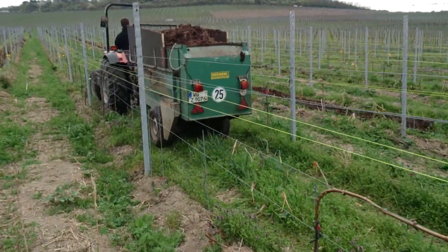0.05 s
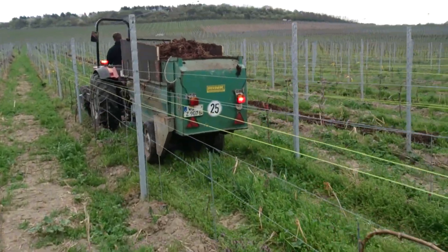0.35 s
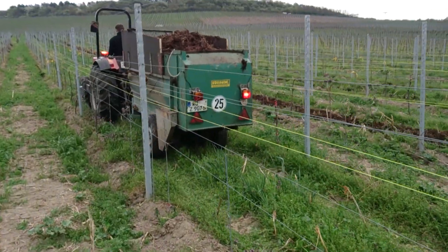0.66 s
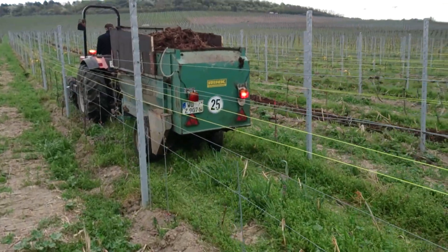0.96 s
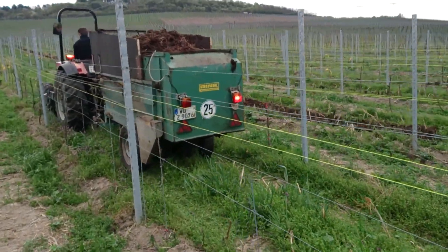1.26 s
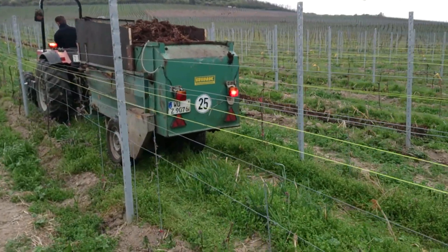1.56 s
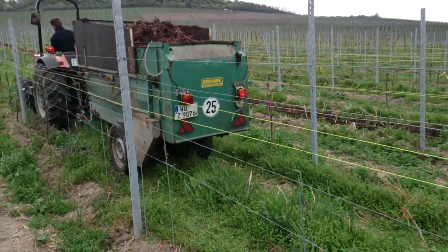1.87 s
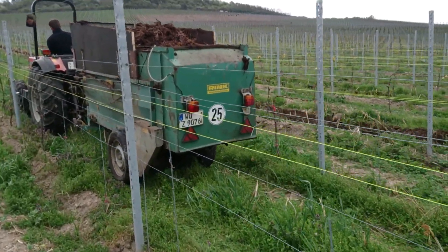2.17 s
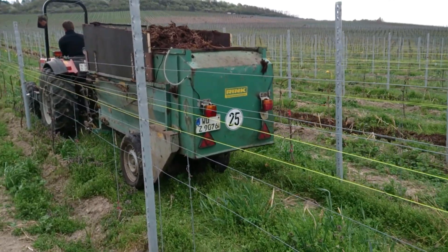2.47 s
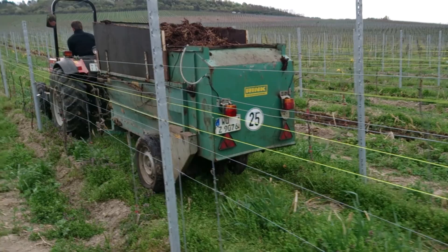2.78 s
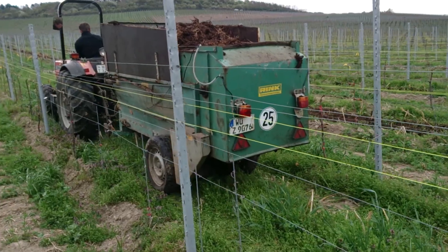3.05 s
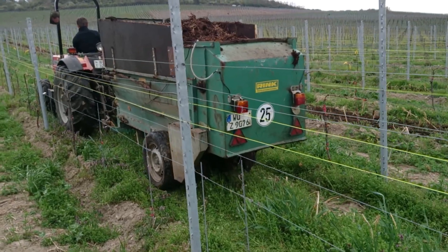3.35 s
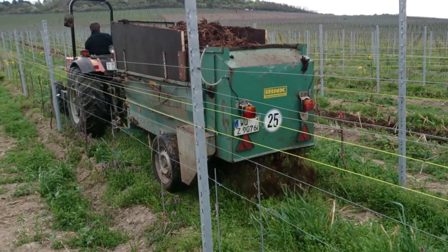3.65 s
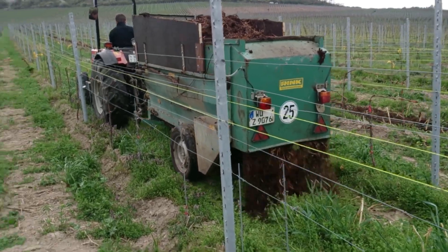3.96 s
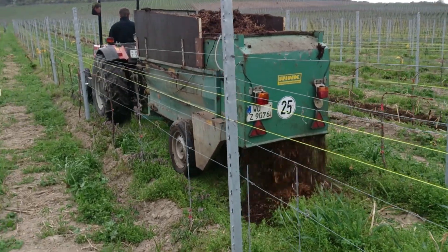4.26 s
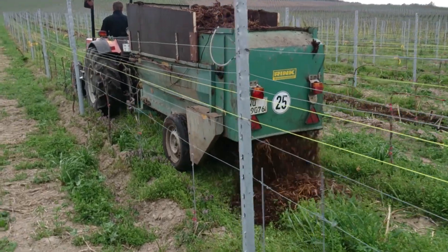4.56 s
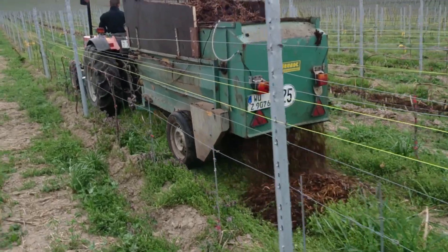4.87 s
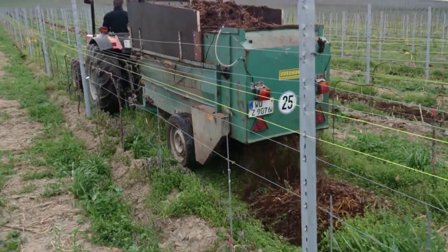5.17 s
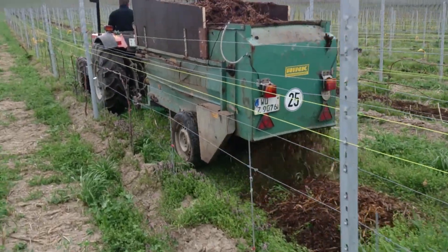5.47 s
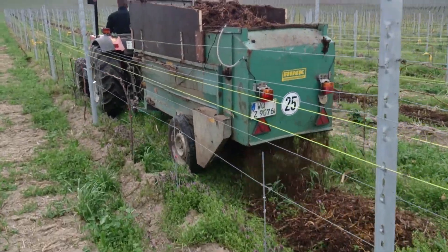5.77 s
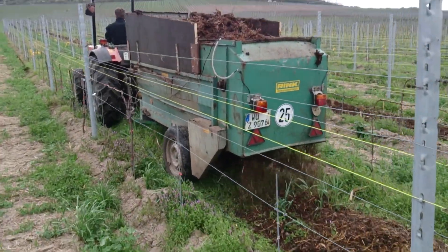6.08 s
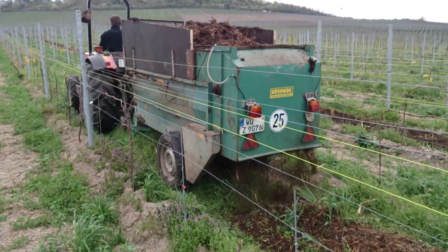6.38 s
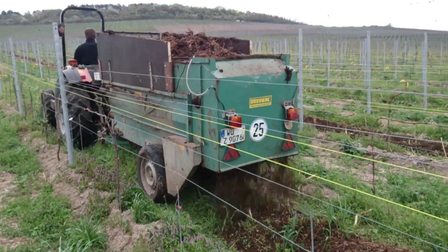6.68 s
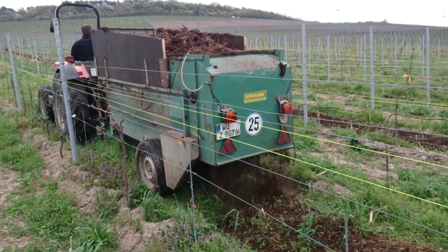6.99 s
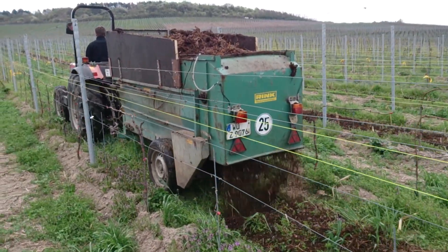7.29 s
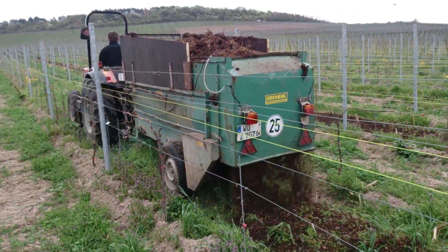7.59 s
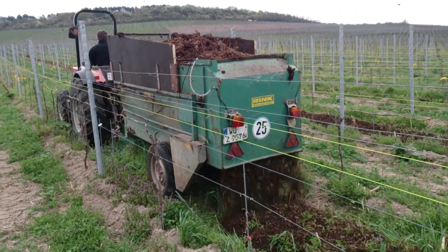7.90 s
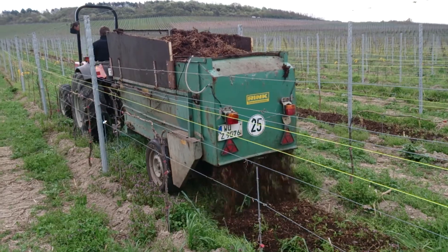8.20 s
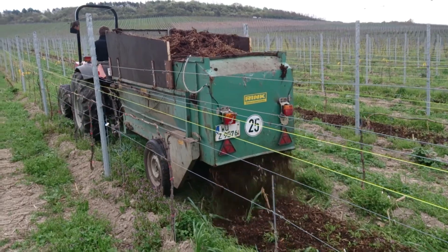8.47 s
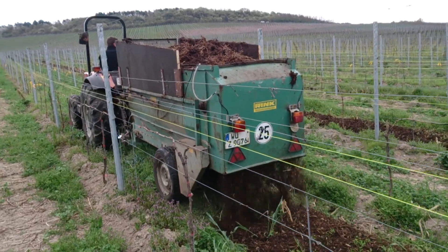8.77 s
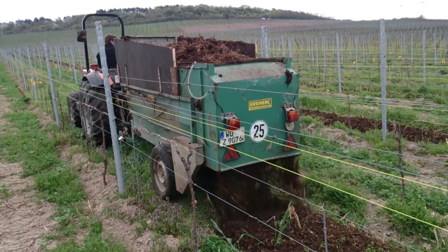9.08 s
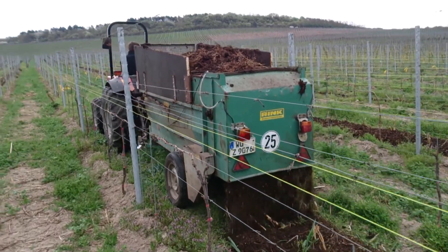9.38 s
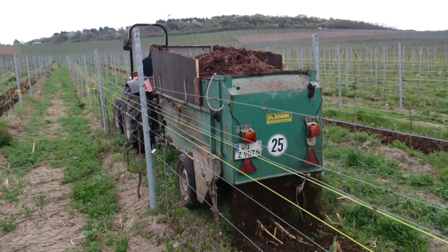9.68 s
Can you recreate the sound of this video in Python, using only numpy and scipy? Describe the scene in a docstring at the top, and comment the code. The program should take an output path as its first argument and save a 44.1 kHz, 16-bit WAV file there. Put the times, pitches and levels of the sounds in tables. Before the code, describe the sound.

Low tractor chugging climbs to a steady drone, joined by sharp ratchet bursts about twice a second from a working spreader.

```python
"""Tractor and compost spreader

A diesel tractor idles in a vineyard row, revs up and drives a spreader a few metres away.
Exhaust pulses boom and the block knocks. About twice a second the feed chain takes up load,
then steel pawls clatter over the ratchet and tick back. Compost patters, grass rustles; no reverb."""
import sys
import numpy as np
from scipy import signal
from scipy.fft import rfft, irfft, next_fast_len
from scipy.io import wavfile
from scipy.ndimage import uniform_filter1d

SR = 44100
rng = np.random.default_rng(int(sys.argv[2]) if len(sys.argv) > 2 else 0)


def wav_record(signal):
    """Record a signal, one row per channel, as 16-bit PCM in the file named by sys.argv[1]."""
    frames = np.transpose(np.atleast_2d(signal))
    bounded = np.clip(frames, -1, 1)
    # unit amplitude maps onto the largest positive 16-bit level
    quanta = np.round(bounded * 32767).astype(np.int16)
    wavfile.write(sys.argv[1], SR, quanta)


N = 433944
TIME_S = np.arange(N) / SR
FFT_SIZE = next_fast_len(N + 16384)
FREQ_HZ = np.arange(FFT_SIZE // 2 + 1) * SR / FFT_SIZE

# Engine speed. Each row: time in seconds, firing rate in Hz.
FIRING_RATE = [(0, 23.1), (.55, 18.46), (2.1, 18.81), (2.2, 22.97), (2.6, 25.55), (3.1, 22.54),
               (3.45, 32.41), (3.6, 35.86), (3.9, 46.95), (4.35, 59.64), (5.1, 58.22), (5.8, 61.96),
               (9.84, 61.73)]
# A blip, a rev-up in pushes, then steady load. Each row: time in seconds, combustion force in dB.
COMBUSTION_FORCE = [(0, -56), (2.16, -55), (2.18, -30.5), (2.275, -30), (2.31, -55), (2.95, -47),
                    (3.14, -32), (3.22, -33), (3.3, -41), (3.33, -22), (3.43, -16), (3.465, -18.5),
                    (3.495, -28), (3.55, -28), (3.58, -20.5), (3.63, -21), (3.81, -12.5), (3.9, -14.5),
                    (4.02, -24.5), (4.15, -15.5), (4.3, -26), (4.5, -33.5), (6.0, -27), (9.84, -29)]
# Cylinders in firing order. Each row: relative strength, delay at full speed in ms.
CYLINDER_SPREAD = [(1, .45), (-0.5, 0.14), (-5.5, -.45), (-.5, -0.1)]
# Gear whines. Each entry: cycles per firing in the first list, relative level in dB in the second.
GEAR_ORDERS = [7.5, 10.25, 12, 13.75]
GEAR_DB = [-7, -16.5, -10, -9.5]
# Engine spectra. Each row: frequency in Hz, gain in dB.
BOOM_SPECTRUM = [(12, -27), (24, -11), (38, 5.5), (55, 1), (76, -0.5), (100, -14), (125, -11.5), (160, -16),
                 (300, -54)]
BARK_SPECTRUM = [(8, -16), (35, 3), (70, 1), (120, 2), (170, -1.5), (235, -10), (320, -22.5), (500, -33),
                 (1200, -33.5), (7000, -56)]
EDGE_SPECTRUM = [(150, -30), (250, -1), (320, 0), (420, -8), (600, -20), (4000, -100)]
GAS_SPECTRUM = [(30, -49), (90, -3), (130, -3), (180, -2.5), (235, -4), (290, -13.5), (400, -26),
                (900, -52)]
BLOCK_SPECTRUM = [(180, -23.5), (300, -5), (369, -9), (424, -9), (464, -1.5), (549, -2.5), (600, 0.5),
                  (816, 1), (1020, -9), (1240, -3), (1370, 0.5), (1490, -4.5), (1650, -4), (3200, -15),
                  (4160, -17), (7040, -120)]
# Exhaust and casting resonances. Each row: frequency in Hz, width in Hz, gain in dB.
TAILPIPE_MODES = [(76.4, 15, -4), (134.5, 16, -5.5), (168, 10, -2.5), (229, 17, -2), (264, 17, -3.5)]
SILENCER_MODES = [(38.4, 10, -1), (74, 11, 1)]
THROB_MODES = [(24, 4.2, 9), (47.6, 11, 5), (70, 12, 3), (98, 12, -2), (123, 6.2, -5), (165, 25, -11)]
KNOCK_MODES = [(793, 150, 1), (1260, 260, 1), (2130, 1200, 2.5), (3950, 170, 7), (4900, 1200, -3)]
HARD_KNOCK_MODES = [(713, 83, 18.5), (822, 47, 21.5), (1296, 200, 20), (1980, 91, 12), (2660, 180, 4),
                    (4060, 380, 9), (5340, 310, 16.5)]
# Exhaust envelopes. Each row: time in seconds, relative level in dB.
BOOM_ENVELOPE = [(2.14, -70), (2.18, -26), (2.27, -28), (2.33, -50), (3.0, -51), (3.15, -37), (3.4, -30),
                 (3.53, -27), (3.8, -25), (4.0, -19), (4.22, -21.5), (4.5, -24.5), (4.9, -22), (6.1, -27),
                 (9.84, -26.5)]
THROB_ENVELOPE = [(0, -41), (.5, -46), (2.1, -44), (2.25, -29), (2.55, -34), (3.0, -34), (3.2, -29),
                  (3.7, -42)]
HUM_ENVELOPE = [(0, -43), (.48, -45), (.52, -36), (.58, -44), (.68, -42), (.74, -35), (1.12, -35.5),
                (1.24, -45), (1.28, -35), (1.45, -35.5), (1.5, -50), (1.6, -32.5), (1.67, -50), (1.72, -35),
                (1.82, -32), (1.91, -40), (2.14, -33.5), (3.3, -60)]
# Shudders at idle. Each row: start in seconds, level in dB.
IDLE_SHUDDERS = [(.468, -48), (1.595, -50), (1.94, -49), (2.133, -41), (2.342, -49)]

# Feed strokes, about 33 firings apart. Each row: start in seconds, clatter gain in dB, load gain in dB.
FEED_STROKES = [(4.2008, -1.5, 6), (4.7751, 0.5, 2.5), (5.339, -0.5, 4.5), (5.884, 1, 5.5), (6.422, -1, 4),
                (6.9605, 2, 5), (7.495, 0, 4.5), (8.0326, 1, 2), (8.5714, 1.5, 5.5), (9.1095, 1, 4),
                (9.649, -1, 5)]
# Four pawls and a bounce per stroke. Each row: delay in firings, gain in dB, chatter in seconds.
STROKE_DROPS = [(0, -6, .007), (1.02, -7, 0.0073), (2.1, -7, .012), (3.45, -6, 0.0058), (4.7, -22, 0.004)]
# Single sharp metallic clicks: start-up strikes, late pawl drops and one lone click.
# Each row: start in seconds, gain in dB.
SINGLE_CLICKS = [(3.495, -10), (3.5195, -11), (3.549, -7.5), (3.634, -12), (3.7117, -5.5), (4.313, -12),
                 (4.919, -19), (5.1504, -9), (5.989, -7), (6.5205, -5.5), (7.052, -11), (7.064, -8.5),
                 (7.593, -5), (8.133, -5), (8.618, -9), (8.671, -4.5), (9.2058, -3), (9.749, -8.5)]
# Loose couplings. Each row: start in seconds, gain in dB.
COUPLING_CLINKS = [(2.179, -32), (2.229, -33.5), (3.092, -40.5), (3.13, -33), (3.252, -37)]
# Spreader steel resonances. Each row: frequency in Hz, width in Hz, gain in dB.
PAWL_MODES = [(7240, 55, 2), (7550, 83, 0), (7970, 65, 0), (8050, 74, 7.5), (8260, 61, -2), (8440, 46, -3),
              (8760, 50, -4), (9200, 98, -16), (9600, 90, -1.5), (13080, 200, -6), (13400, 230, 1.5),
              (13660, 300, -3)]
WHEEL_MODES = [(3540, 40, 4), (4040, 60, -1), (4380, 45, -2), (4850, 70, -1), (5540, 40, -3),
               (6620, 50, -1)]
CATCH_MODES = [(7240, 71, -1), (7300, 90, 1), (7470, 110, -11), (12100, 390, -7), (12300, 400, -13)]
LINK_MODES = [(632, 68, 6), (1378, 44, 2), (1720, 100, -3.5), (1950, 80, 1), (3250, 130, 0),
              (3510, 110, -2.5), (3870, 105, -1)]
BODY_MODES = [(1337, 20, 0), (1377, 14, 7), (1394, 17, 6.5), (1432, 31, -9), (1694, 30, -2.5),
              (1930, 40, -2), (2750, 16, -12), (3170, 17, -9), (3540, 24, -3.5), (4020, 69, -7),
              (4530, 170, -8)]
COUPLING_MODES = [(4070, 200, 17), (5260, 420, 15.5), (6100, 280, 13)]
# Spreader spectra. Each row: frequency in Hz, gain in dB.
CRACK_SPECTRUM = [(1200, -14), (2800, -8.5), (3550, -1), (4700, -6.5), (6000, -8.5), (7200, 4.5),
                  (8500, 7.5), (11300, -7), (13400, 8.5), (15500, -25)]
CLUNK_SPECTRUM = [(200, 8), (400, 11.5), (700, -6), (1050, 15.5), (1400, 15), (2100, 7), (2800, 12),
                  (3700, -3), (6000, 1), (10000, 9.5), (15000, -17)]
GROAN_SPECTRUM = [(150, 2), (240, 3.5), (380, -5.5), (700, 10), (1050, 1), (1400, 7), (2100, 0),
                  (3700, -3.5), (6000, -4.5), (12000, -17)]
COMPOST_SPECTRUM = [(500, 1), (1500, -5.5), (2100, -2.5), (3000, -5), (4300, 4.5), (6000, 0), (8000, 1),
                    (10000, 3), (13000, -0.5), (15500, 3.5)]
# Slipping drive. Each row: time in seconds, level in dB, pitch in Hz.
DRIVE_SLIP = [(3.22, -90, 5630), (3.33, -32, 5580), (3.7, -38, 6200), (3.85, -27, 6440), (4.1, -32, 5970),
              (4.3, -24, 5520), (4.45, -73, 5630)]
# Compost, brake and grass envelopes. Each row: time in seconds, relative level in dB.
COMPOST_ENVELOPE = [(3.25, -50), (3.42, -35), (3.53, -23), (3.62, -32), (3.76, -25.5), (4.2, -32.5),
                    (4.6, -30), (6.5, -31), (8.5, -28.5), (9.84, -29.5)]
BRAKE_ENVELOPE = [(.38, -91), (.48, -63), (.64, -52), (.74, -55), (.86, -90)]
RUSTLE_ENVELOPE = [(0, -47), (.5, -50.5), (1.05, -50), (1.5, -53), (2.1, -47.5), (2.45, -47.5), (3.3, -44)]

# Stalk snaps and swishes. Each row: start in seconds, relative level in dB, hold in seconds.
STALK_SNAPS = [(.235, -39, 0.032), (.345, -45, .02), (.694, -37, .001), (.709, -37, .002),
               (.83, -49, 0.049), (.961, -43, .001), (1.31, -35, .002), (1.722, -41, 0.018),
               (1.78, -37.5, 0.077), (1.835, -35, .002), (1.914, -38, .001), (2.64, -42.5, 0.045),
               (2.99, -37, .002), (3.279, -35, .002)]
# Grass spectra. Each row: frequency in Hz, gain in dB.
RUSTLE_SPECTRUM = [(1500, 3), (2400, 7), (3400, 1), (4200, 4), (7000, 1), (10000, 2), (14000, 2),
                   (16000, 4.5)]
SNAP_SPECTRUM = [(1500, -14), (3200, -4), (4300, 1), (5500, 1), (7500, 2), (10000, 2), (14000, 7),
                 (15500, 12.5)]
# Microphone response. Each row: frequency in Hz, gain in dB.
MIC_RESPONSE = [(5, -37), (25, -1), (300, -1), (1500, 0.5), (2200, 1), (4500, -2), (8000, 0.5),
                (13500, 1.5), (14500, -4), (15500, -13)]
# Microphone ports. Each row: frequency in Hz, left minus right in dB.
PORT_BALANCE = [(100, 0.36), (700, 0.5), (1400, 1), (2500, 4.5), (5000, 4), (7500, 6.5), (10000, 16.5),
                (11200, 8), (12400, 3.5), (13500, -6.5), (15500, 21)]


def engine(firing_hz, firings):
    """Four-cylinder diesel: exhaust and block follow speed and combustion force."""
    speed = firing_hz / firing_hz.max()
    force_db, = curves(COMBUSTION_FORCE)
    pipe = gas_rush(speed, firings) + idle(firings) - exhaust(speed, firings, force_db)
    castings = block(speed, firings, force_db) + diesel_knock(speed, firings, force_db)
    return place(pipe, lag_ms=0.12) + place(castings, lag_ms=0.26)


def exhaust(speed, firings, force_db):
    """Each firing sends a pulse down the pipe: a soft boom and a bark that rings the tailpipe."""
    fired = firing_samples(firings)
    boom_jitter, bark_jitter, time_jitter = rng.standard_normal((len(fired), 3)).T
    # Cylinders differ most at full speed, adding lines between the firing harmonics.
    imbalance = speed[fired] ** 7
    strength, skew_ms = np.resize(CYLINDER_SPREAD, (len(fired), 2)).T * imbalance
    delay_ms = 3.8 + skew_ms + (0.056 + 0.15 * imbalance) * time_jitter
    arrivals = np.clip(fired + (SR * delay_ms / 1000).astype(int), 0, N - 1)
    booms, barks = np.zeros((2, N))
    booms[arrivals] = amp(0.041 * strength + 0.35 * boom_jitter)
    barks[arrivals] = amp(1.54 * strength + (1.2 + 0.73 * imbalance) * bark_jitter)
    boom_db, = curves(BOOM_ENVELOPE)
    boom = steady(filtered(booms, amp(spectrum_db(BOOM_SPECTRUM)))) * amp(boom_db - 1.5)
    bark = filtered(barks, amp(spectrum_db(BARK_SPECTRUM)))
    bark = steady(bark + ring(bark, TAILPIPE_MODES)) * amp(force_db - 0.5)
    # The hardest pulses steepen in the pipe.
    edge = steady(filtered(barks, amp(spectrum_db(EDGE_SPECTRUM))))
    return boom + bark + edge * amp(1.6 * force_db - 24.5) / speed ** 2


def gas_rush(speed, firings):
    """Gas rushes out after each firing; turbulence grows with speed."""
    return unit(colour(surge(firings) * noise(), GAS_SPECTRUM)) * amp(-30.5) * speed ** 2.06


def idle(firings):
    """Weak, uneven firings and swirling gas swing pipe and silencer; shudders knock the castings."""
    fired = firing_samples(firings)
    time_jitter, level_jitter = rng.standard_normal((len(fired), 2)).T
    arrivals = np.clip(fired + (SR * 0.0011 * time_jitter).astype(int), 0, N - 1)
    pulses = np.zeros(N)
    pulses[arrivals] = amp(2.5 * level_jitter)
    muffle = 1 / np.sqrt(1 + (FREQ_HZ / 185) ** 16)  # silencer low-pass
    swirl = 0.5 * noise() * puffs(firings, decay_firings=0.6)
    throb = ring(filtered(unit(pulses) + swirl, muffle), THROB_MODES)
    hum = ring(ring(filtered(pulses, muffle), SILENCER_MODES), SILENCER_MODES)
    throb_db, = curves(THROB_ENVELOPE)
    hum_db, = curves(HUM_ENVELOPE)
    shudders = bursts([(s, db, 0.012) for s, db in IDLE_SHUDDERS], decay_s=0.016)
    knocks = shudders * unit(ring(stereo_noise(apart=0.4), HARD_KNOCK_MODES))
    return knocks - steady(throb) * amp(throb_db) - steady(hum) * amp(hum_db)


def block(speed, firings, force_db):
    """Block noise grows with speed and force; gears whine at multiples of the firing rate."""
    gain = np.hypot(amp(-29.5 + 10 * np.log2(speed)), amp(-15.5 + 0.77 * force_db))
    roar = unit(colour(surge(firings) * stereo_noise(apart=0.32), BLOCK_SPECTRUM))
    whine = sum(np.sin(2 * np.pi * order * firings + 0.71 * drift(7)) * amp(db - 5 + 2 * drift(4.5))
                for order, db in zip(GEAR_ORDERS, GEAR_DB))
    return gain * (roar + whine * speed ** 8)


def diesel_knock(speed, firings, force_db):
    """Combustion rings the castings; with much fuel at low speed each firing is a separate crack."""
    speed_db = 10 * np.log2(speed)
    impacts = puffs(firings, decay_firings=0.32) * stereo_grains(6000, spread_db=2, apart=1)
    running = unit(ring(impacts, KNOCK_MODES)) * amp(-38.5 + speed_db)
    crack_db = force_db - 17.5 - speed_db
    lag_s = 0.0015
    cracks = [(TIME_S[i] + lag_s, crack_db[i], 0.002) for i in firing_samples(firings)]
    return running + ring(bursts(cracks, decay_s=0.004) * stereo_noise(apart=0.45), HARD_KNOCK_MODES)


def ratchet(firings):
    """Each pawl cracks down and chatters, ringing pawl and wheel; single clicks share that ring."""
    strikes = [(later_s(firings, s, delay) + rng.normal(0, 0.00038), db + drop_db, chatter_s)
               for s, db, _ in FEED_STROKES for delay, drop_db, chatter_s in STROKE_DROPS]
    strikes += [(s, db, 0.0074) for s, db in SINGLE_CLICKS]
    rebounds = bursts(strikes, decay_s=0.0075)
    blows = bursts([(s, db, 0.001) for s, db, _ in strikes], decay_s=0.0006)
    rattle = stereo_grains(22000, spread_db=0.3, apart=0.85)
    contact = (rebounds + 1.3 * blows) * rattle
    pawl = amp(-30.5) * unit(ring(contact, PAWL_MODES))
    wheel = amp(-46) * unit(ring(contact, WHEEL_MODES))
    crack = amp(-30) * unit(colour(rebounds * rattle, CRACK_SPECTRUM))
    return place(pawl + wheel + crack, lag_ms=0.17)


def catch_return(firings):
    """The catch ticks back over five teeth after each stroke, louder as the spreader runs in."""
    return_firings, tooth_firings, rise_db_per_s = 11.9, 1.9, 1
    teeth = [(later_s(firings, s, return_firings + tooth * tooth_firings),
              -7.5 + rise_db_per_s * s + rng.normal(0, 1.5), 0.005)
             for s, _, _ in FEED_STROKES for tooth in range(5)]
    ticks = bursts(teeth, decay_s=0.012) * stereo_grains(2600, spread_db=1.5, apart=0.92)
    ringing = amp(-43) * unit(ring(ticks, CATCH_MODES))
    crack = amp(-44) * unit(colour(ticks, CRACK_SPECTRUM))
    return place(ringing + crack, lag_ms=0.17)


def floor_chain(firings):
    """The chain jolts taut once, then crunches and groans forward just before each stroke's pawls."""
    lead_firings, load_s = 2.65, 0.18
    jolt_s, jolt_db, jolt_hold_s = 3.707, 10.5, 0.013
    loads = [(later_s(firings, s, -lead_firings), db, load_s) for s, _, db in FEED_STROKES]
    loads.append((jolt_s, jolt_db, jolt_hold_s))
    jerk = bursts([(s + 0.0017, db, 0.022) for s, db, _ in loads], decay_s=0.0065)
    jerk = uniform_filter1d(jerk, size=500)  # slack comes out link by link
    links = jerk * stereo_grains(7000, spread_db=1.2, apart=0.7)
    clunk = amp(-42) * unit(colour(links, CLUNK_SPECTRUM)) + amp(-40.5) * unit(ring(links, LINK_MODES))
    pull = bursts(loads, decay_s=0.057) * amp(3 * drift(70))
    rub = pull * stereo_grains(5000, spread_db=1, apart=0.65)
    groan = amp(-36.5) * unit(colour(rub, GROAN_SPECTRUM)) + amp(-44) * unit(ring(rub, LINK_MODES))
    return place(clunk + groan, lag_ms=0.2)


def body_drone():
    """The spreader's steel body drones as the beaters spin up."""
    gain = amp(-36.5 + 2.4 * drift(12)) * ramp(start_s=3.3, rise_s=1)
    return place(gain * unit(ring(stereo_noise(apart=0.49), BODY_MODES)), lag_ms=0.2)


def compost():
    """Compost patters down; hard bits tick against the steel."""
    flow_db, = curves(COMPOST_ENVELOPE)
    crumbs = stereo_grains(14000, spread_db=1.8, apart=1.3) * amp(0.9 * drift(30))
    patter = amp(flow_db) * ramp(start_s=3.25, rise_s=0.081) * unit(colour(crumbs, COMPOST_SPECTRUM))
    bits = ramp(start_s=3.5, rise_s=0.5) * grains(5.8, spread_db=0.5)
    return place(patter + amp(-57) * unit(colour(bits, CRACK_SPECTRUM)), lag_ms=0.2)


def drive_slip(firings):
    """The engaging drive slips at each firing with a rough hiss."""
    slip_db, slip_hz = curves(DRIVE_SLIP)
    rough = unit(colour(stereo_noise(apart=0.7), [(350, 0), (700, -6), (1400, -18), (3000, -45)]))
    chop = unit(puffs(firings, decay_firings=0.32) + 0.24)
    return place(rough * chop * amp(slip_db) * tone(slip_hz), lag_ms=0.14)


def couplings():
    """Loose drive couplings clink before the spreader starts."""
    clinks = bursts([(s, db, 0.003) for s, db in COUPLING_CLINKS], decay_s=0.01)
    return place(ring(clinks * stereo_noise(apart=0.41), COUPLING_MODES), lag_ms=0.2)


def brake():
    """A thin, wavering brake squeal while creeping."""
    brake_db, = curves(BRAKE_ENVELOPE)
    return place(amp(brake_db) * tone(9055 + 22 * drift(64)), lag_ms=0.14)


def grass():
    """Stalks crackle and snap under tyres and boots, a little to the right."""
    bed_db, = curves(RUSTLE_ENVELOPE)
    crackle = stereo_grains(8000, spread_db=3.5, apart=2.3)
    bed = amp(bed_db + 4 + 2 * drift(16)) * unit(colour(crackle, RUSTLE_SPECTRUM))
    snap_gain = bursts(STALK_SNAPS, decay_s=0.0067) * amp(4.5 + 3.1 * drift(80.17))
    snaps = snap_gain * unit(colour(crackle, SNAP_SPECTRUM))
    return (bed + snaps) * amp([[-2.25], [2.25]])


def firing_samples(firings):
    """First sample of each firing."""
    return np.flatnonzero(np.diff(np.floor(firings))) + 1


def later_s(firings, start_s, count):
    """The time count firings after start_s."""
    return np.interp(np.interp(start_s, TIME_S, firings) + count, firings, TIME_S)


def puffs(firings, decay_firings):
    """Envelope that jumps at each firing and decays."""
    return unit(np.exp(-(firings % 1) / decay_firings))


def surge(firings):
    """Shallow pulsing at the firing rate."""
    return unit(puffs(firings, decay_firings=0.43) + 5.3)


def bursts(rows, decay_s):
    """Envelope of contacts that start at once, hold, then decay; powers add."""
    power = np.zeros(N)
    for start_s, db, hold_s in rows:
        start = int(start_s * SR)
        age_s = TIME_S[:min(N - start, SR // 2)]
        envelope = amp(db) * np.exp(-np.maximum(age_s - hold_s, 0) / decay_s)
        power[start:start + len(age_s)] += envelope ** 2
    return np.sqrt(power)


def ramp(start_s, rise_s):
    """Linear fade from 0 to 1."""
    return np.clip((TIME_S - start_s) / rise_s, 0, 1)


def curves(rows):
    """Table columns interpolated over time."""
    times_s, *columns = np.transpose(rows)
    return [np.interp(TIME_S, times_s, column) for column in columns]


def tone(hz):
    """Sine of varying pitch."""
    return np.sin(2 * np.pi * np.cumsum(hz) / SR)


def noise():
    """White noise."""
    return rng.standard_normal(N)


def drift(rate_hz):
    """Smooth random motion, rms 1."""
    span = int(SR / rate_hz)
    steps = np.repeat(rng.standard_normal(N // span + 1), span)
    return unit(uniform_filter1d(uniform_filter1d(steps, span), span)[:N])


def grains(per_s, spread_db):
    """Random tiny impacts of uneven size."""
    impacts = (rng.random(N) < per_s / SR) * noise()
    return unit(impacts * amp(spread_db * np.minimum(rng.exponential(size=N), 5)))


def stereo_noise(apart):
    """Shared noise plus a separate share per side."""
    return unit(noise() + apart * np.array([noise(), noise()]))


def stereo_grains(per_s, spread_db, apart):
    """Shared impacts plus a separate share per side."""
    shared, left, right = (grains(per_s, spread_db) for _ in range(3))
    return unit(shared + apart * np.array([left, right]))


def amp(db):
    """Decibels to gain."""
    return 10 ** (np.asarray(db) / 20)


def unit(x):
    """Scale to rms 1."""
    return x / np.sqrt(np.mean(x ** 2))


def steady(x):
    """Hold a pulse train near rms 1 as its rate changes."""
    power = uniform_filter1d(uniform_filter1d(x ** 2, size=4800), size=4800)
    return x / np.sqrt(power + 1e-12)


def spectrum_db(points):
    """(Hz, dB) points interpolated over log frequency."""
    hz, db = np.transpose(points)
    return np.interp(np.log(FREQ_HZ + 1), np.log(hz), db)


def filtered(x, response):
    """Apply a frequency response."""
    return irfft(rfft(x, FFT_SIZE) * response, FFT_SIZE)[..., :N]


def colour(x, points):
    """Minimum-phase filter with the given spectrum."""
    cepstrum = irfft(np.log(amp(spectrum_db(points))), FFT_SIZE)
    cepstrum[1:FFT_SIZE // 2] *= 2
    cepstrum[FFT_SIZE // 2 + 1:] = 0
    return filtered(x, np.exp(rfft(cepstrum)))


def ring(x, modes):
    """Parallel resonators."""
    response = sum(amp(db) * 1j * FREQ_HZ * width_hz / (hz ** 2 - FREQ_HZ ** 2 + 1j * FREQ_HZ * width_hz)
                   for hz, width_hz, db in modes)
    return filtered(x, response)


def place(x, lag_ms):
    """Stereo, with the right side lagging."""
    delay = np.exp(-2j * np.pi * FREQ_HZ * lag_ms / 1000)
    return filtered(x, np.array([np.ones(len(FREQ_HZ)), delay]))


def scene():
    """Tractor, spreader and ground, sharing one running count of firings."""
    firing_hz, = curves(FIRING_RATE)
    firings = np.cumsum(firing_hz) / SR
    tractor = engine(firing_hz, firings)
    feed = ratchet(firings) + catch_return(firings) + floor_chain(firings)
    return tractor + feed + body_drone() + compost() + drive_slip(firings) + couplings() + brake() + grass()


def record(dry):
    """Two microphone ports colour the treble differently and lose both extremes; clip, then low-pass."""
    balance_db = spectrum_db(PORT_BALANCE)
    ported = filtered(dry, amp(spectrum_db(MIC_RESPONSE) + np.array([balance_db, -balance_db]) / 2))
    low_pass = signal.ellip(8, 0.2, 70, 15400, fs=SR, output="sos")
    return signal.sosfilt(low_pass, np.clip(ported, -1, 1))


dry = scene()
out = record(dry)
wav_record(out)
```